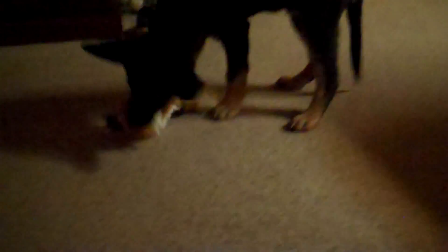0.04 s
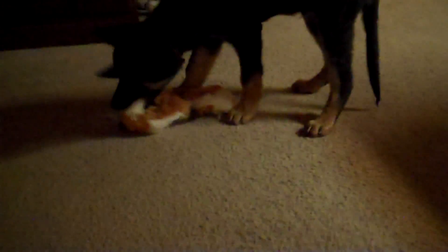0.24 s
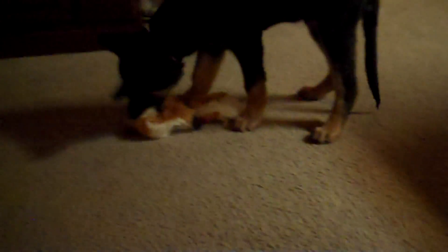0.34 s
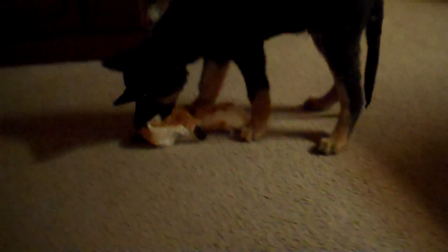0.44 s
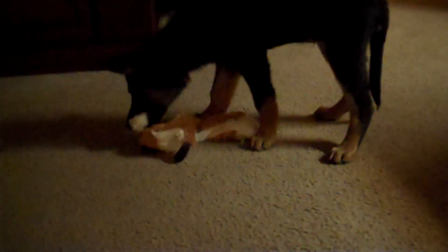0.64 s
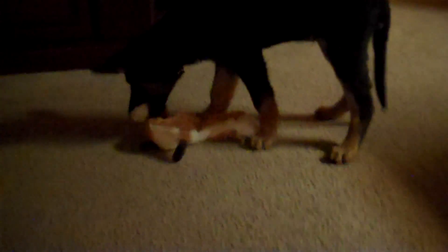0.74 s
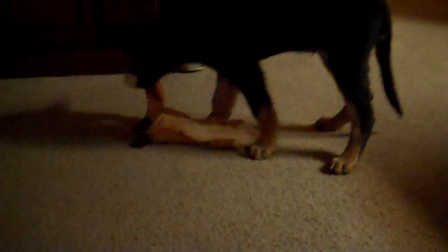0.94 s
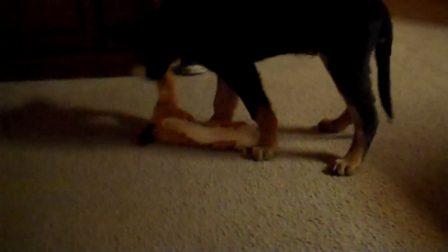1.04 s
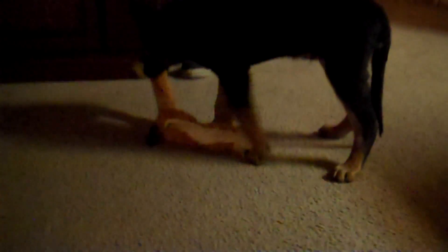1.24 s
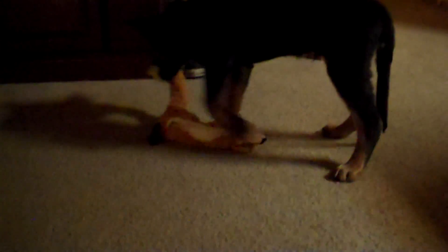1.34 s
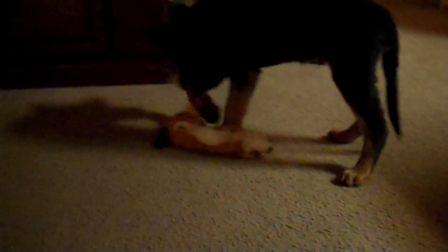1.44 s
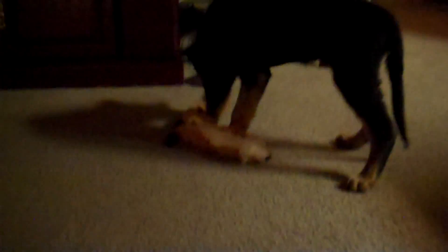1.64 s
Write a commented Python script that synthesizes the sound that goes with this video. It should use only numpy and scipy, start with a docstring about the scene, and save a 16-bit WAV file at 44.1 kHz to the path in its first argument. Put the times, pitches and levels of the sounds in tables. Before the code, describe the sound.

A squeaky toy gives four short, bright squeaks in an even rhythm as a dog chews it. Weak croaks, soft knocks, tooth ticks and plush rubbing fall between them, close to the microphone in a quiet carpeted room.

```python
"""A dog chews a plush squeaky toy on a carpet, close to a small camera, over a quiet room's low hum.
First air whistles into the bladder. From 0.2 s, four bites, 0.3 s apart, drive air through a plastic
reed that slaps shut about a thousand times a second. Between bites and into the last, weak flow makes
it croak, while jaws and paws knock, teeth tick and plush rubs. Soft knocks, a rub and a tick at 1.45 s
end the chewing. The room reverberates briefly after each sound."""
import sys
import numpy as np
from scipy import signal
from scipy.fft import rfft, irfft
from scipy.io import wavfile
from scipy.ndimage import uniform_filter1d

SR = 44100
rng = np.random.default_rng(int(sys.argv[2]) if len(sys.argv) > 2 else 0)


def generate_wav(signal):
    """Clip the signal to [-1, 1] and save it as 16-bit WAV at the path in sys.argv[1]."""
    frames = np.transpose(np.atleast_2d(signal))
    scaled = np.clip(frames, -1, 1) * 32767
    pcm = np.round(scaled).astype(np.int16)
    wavfile.write(sys.argv[1], SR, pcm)


N = 74970
HZ, TIME = np.fft.rfftfreq(N, 1 / SR), np.arange(N) / SR


def amp(db):
    """Amplitude ratio: tenfold for every 20 dB."""
    return 10 ** (np.asarray(db) / 20)

def unit(x):
    """Normalisation to rms 1."""
    return x / np.sqrt(np.mean(x ** 2) + 1e-20)

def read(points, hz):
    """Interpolation on a log-frequency axis."""
    f, value = np.transpose(points)
    return np.interp(np.log(hz + 1), np.log(f + 1), value)

def add(mix, start_s, sound):
    """Superposition of a delayed sound on the mix."""
    part = mix[max(round(start_s * SR), 0):][:len(sound)]
    part += sound[:len(part)]

def colour(x, gain_db):
    """Minimum-phase filter: the phase follows from the Hilbert transform of the log gain."""
    log_gain = np.log(amp(np.maximum(gain_db, -100)))
    mirrored = np.concatenate([log_gain, log_gain[-2:0:-1]])
    taps = np.fft.ifft(np.exp(np.conj(signal.hilbert(mirrored)))).real
    return signal.fftconvolve(x, taps[:2048])[:len(x)]

def noise(gain):
    """Spectral shaping of white noise, at rms 1."""
    return unit(irfft(rfft(rng.standard_normal(N)) * gain, N))

def resonances(modes):
    """Random excitation of damped modes: a narrow band of noise each."""
    return sum(amp(db) * noise(1 / (1 + 2 * ((HZ - hz) / width) ** 2)) for hz, width, db in modes)

def pair(a, b, correlation):
    """Partial coherence: two independent signals mix into left and right spectra."""
    shared = np.clip(read(correlation, HZ), -1, 1)
    return np.array([rfft(a), shared * rfft(a) + np.sqrt(1 - shared ** 2) * rfft(b)])

def wobble(length):
    """Random modulation: a moving average of noise over about one reed cycle."""
    return unit(uniform_filter1d(rng.standard_normal(length), 40))


# ambient noise spectrum: (frequency [Hz], relative density [dB])
AMBIENT = [(40, -32), (68, -2.5), (190, -5.5), (320, -1), (1030, -9), (2000, -13.5), (4400, -19),
           (6500, -15.5), (7700, -17), (9200, -25), (14000, -29)]
# its left-right coherence: (frequency [Hz], correlation [0-1])
AMBIENT_COHERENCE = [(290, 0.99), (640, 0.9), (1400, 0.63), (3000, .05)]
# its balance: (frequency [Hz], left minus right [dB])
AMBIENT_BALANCE = [(60, -6), (300, -1.5), (4400, -2.5), (6200, -6.5), (8000, 5.5), (14000, -3)]
# hum bands: (frequency [Hz], width [Hz], level [dB])
HUM = [(141, 22.4, -57.5), (288.8, 9.2, -61.5)]
def background():
    """Stationary noise: broadband rumble and hiss, with narrow bands that waver as a hum."""
    gain = amp(read(AMBIENT, HZ))
    air = amp(-49.5) * pair(noise(gain), noise(gain), AMBIENT_COHERENCE) + rfft(resonances(HUM))
    return irfft(air * amp(read(AMBIENT_BALANCE, HZ) * np.array([[.5], [-.5]])), N)


# reverberation time: (frequency [Hz], time to fall 60 dB [s])
ROOM_T60 = [(300, 0.27), (650, 0.37), (1200, 0.31), (7000, 0.23), (14000, 0.19)]
# spectrum of the tail: (frequency [Hz], gain [dB])
ROOM_COLOUR = [(200, 0.5), (1100, 6), (3500, -0.5), (6500, 2), (9000, -1), (14000, 8.5)]
# its left-right coherence: (frequency [Hz], correlation [0-1])
ROOM_COHERENCE = [(700, .92), (1400, 0.75), (3000, 0.078)]
def room(x, reflections_per_s=5000, delay_s=.0047, balance_db=-1.5):
    """Diffuse reverberation: random reflections decay exponentially, each band at its own rate."""
    taps = rng.standard_normal((2, N)) * (rng.random((2, N)) < reflections_per_s / SR)
    hz, t, bands = signal.stft(taps, SR, nperseg=256)
    decay = amp(-60 * t / read(ROOM_T60, hz)[:, None])
    tail = signal.istft(bands * decay, SR)[1][:, :N] * np.clip(TIME / delay_s - 1, 0, 1)
    spectra = pair(*tail / np.linalg.norm(tail[0]), ROOM_COHERENCE)
    tail = irfft(spectra * amp(read(ROOM_COLOUR, HZ)), N)
    return signal.fftconvolve(x[None], tail, axes=1)[:, :N] * amp(balance_db * np.array([[.5], [-.5]]))


# envelope of the inflow: (time [s], level [dB])
WHISTLE = [(.04, -58), (.085, -48), (.098, -61), (.115, -52), (.138, -54), (.165, -65)]
# its resonances: (frequency [Hz], width [Hz], relative level [dB])
WHISTLE_MODES = [(596, 45, -1), (964, 70, -2.5), (2260, 290, -1.5), (6400, 540, -5.5)]
def whistle():
    """Flow-excited resonance: air is drawn back into the bladder through the idle reed."""
    level_db = np.interp(TIME, *np.transpose(WHISTLE), left=-120, right=-120)
    return unit(resonances(WHISTLE_MODES)) * amp(level_db)


# strokes of the cloth: (time [s], duration [s], level [dB], tilt [dB/kHz])
RUBS = [(0.313, 0.063, -52, -1.5), (0.76, 0.032, -44.5, -0.5), (1.084, 0.045, -37.5, 0.5),
        (1.409, 0.036, -36, 1.5)]
# friction spectrum: (frequency [Hz], gain [dB])
PLUSH = [(150, -45), (500, 8), (2500, -11), (6000, -14.5), (14000, -15.5)]
def rubs(grain_db=3):
    """Friction noise: plush slides on teeth and carpet in short grainy swells."""
    out = np.zeros(N)
    for start, duration, db, tilt_db in RUBS:
        cloth = noise(amp(read(PLUSH, HZ) + tilt_db * HZ / 1000))
        swell = np.sin(np.pi * np.clip((TIME - start) / duration, 0, 1))
        out += amp(db) * unit(cloth * amp(grain_db * wobble(N))) * swell
    return out


# tooth contacts: (time [s], level before filtering [dB])
TICKS = [(.3414, -21.5), (.481, -34), (.660, -37), (0.9547, -23.5), (1.4505, -19)]
# their spectrum: (frequency [Hz], gain [dB])
TICK_COLOUR = [(1500, -17), (4000, -7), (7000, -3.5), (14000, 8)]
def ticks(decay_s=.0013):
    """Hard impact: teeth meet in a broadband impulse with a tiny scatter behind it."""
    out, t = np.zeros(N), np.arange(0, .01, 1 / SR)
    for start, db in TICKS:
        tail = .5 * rng.standard_normal(len(t)) * np.exp(-t / decay_s)
        add(out, start, amp(db) * (2 * (t == 0) + tail))
    return colour(out, read(TICK_COLOUR, HZ))


# padded impacts: (time [s], level before filtering [dB], frequency [Hz], decay time [s])
KNOCKS = [(.1742, -18.5, 1170, .0009), (.2130, -21.5, 750, .0013), (.4526, -27, 620, .0009),
          (.4531, -29, 1500, .0009), (.5308, -24, 700, .0012), (.7741, -22, 950, .0006),
          (.7878, -35, 800, .002), (1.0672, -22, 950, .0006), (1.0677, -25, 3300, .0004),
          (1.3608, -25.5, 1200, .0011), (1.3628, -27, 2750, .0006), (1.372, -33, 1250, .002)]
# their spectrum: (frequency [Hz], gain [dB])
KNOCK_COLOUR = [(60, -23.5), (400, 0.5), (14000, -8.5)]
def knocks(rise_s=.00005):
    """Damped oscillation: jaws and paws strike the toy, which snaps and rings for a cycle or two."""
    out, t = np.zeros(N), np.arange(0, .03, 1 / SR)
    for start, db, hz, decay_s in KNOCKS:
        snap = 2 * amp(-8.5) * uniform_filter1d(rng.standard_normal(len(t)), size=6)
        envelope = np.exp(-t / decay_s) * (1 - np.exp(-t / rise_s))
        add(out, start, amp(db) * (np.sin(2 * np.pi * hz * t) + snap) * envelope)
    return colour(out, read(KNOCK_COLOUR, HZ))


def scatter(x, level_db=-14, decay_s=.009):
    """Scattering: the dog's head and legs return short wavelengths as a spray of early reflections."""
    t = np.arange(0, .015, 1 / SR)
    taps = rng.standard_normal(len(t)) * np.exp(-t / decay_s)
    treble = signal.sosfilt(signal.butter(2, 3500, "high", fs=SR, output="sos"), x)
    return amp(level_db) * signal.fftconvolve(treble, taps / np.linalg.norm(taps))[:N]

def floor_bounce(x, reflection=.13, tilt_db_per_khz=-.31):
    """Absorption: the carpet reflects a weak copy with less treble."""
    return reflection * colour(x, tilt_db_per_khz * HZ / 1000)


# strong flow through the reed: (time [s], pitch [Hz], level [dB], roughness [0-1])
BITE_1 = [(.2148, 1075, -14, .06), (.217, 1086, -11, .06), (.2218, 1147, -12.5, .03),
          (.2285, 1075, -13.5, .03), (.234, 1102, -15.5, .05), (.239, 1130, -20, .08),
          (.245, 1115, -29, .15)]
BITE_2 = [(.5318, 965, -22, .15), (.5335, 1024, -14.5, .06), (.546, 1016, -17, .05), (.555, 1002, -18, .09),
          (.559, 972, -22, .16), (.564, 920, -25.5, .22), (.570, 870, -35, .25)]
BITE_3 = [(.8317, 997, -21, .06), (.8336, 1016, -15, .05), (.843, 1020, -18.5, .05), (.846, 1075, -14, .09),
          (.8495, 1110, -14.2, .1), (.856, 1029, -16.5, .13), (.862, 945, -23.5, .2), (.867, 880, -30, .25)]
BITE_4 = [(1.1215, 1070, -17.5, .05), (1.1235, 1092, -14, .06), (1.131, 1215, -12.5, .1),
          (1.135, 1070, -16, .3), (1.138, 985, -19.5, .45), (1.143, 930, -24.5, .55), (1.149, 880, -35, .6)]
# weak flow: (time [s], pitch [Hz], level [dB], roughness [0-1])
CROAK_1 = [(.346, 830, -42, .3), (.351, 680, -37, .3), (.359, 560, -46, .3)]
CROAK_2 = [(.9615, 784, -45.5, 0.11), (.967, 753, -27.5, 0.11), (.972, 710, -30, 0.13),
           (.976, 649, -36.5, 0.11), (.981, 612, -44, 0.21)]
CROAK_3 = [(1.087, 610, -45, .8), (1.096, 640, -36.5, .5), (1.104, 695, -36, .3), (1.119, 715, -35, .25),
           (1.145, 712, -41, .3)]
CROAK_4 = [(1.098, 565, -50, 0.33), (1.115, 600, -36, 0.32), (1.138, 593, -40, .25)]
# reed spectra when open, bitten hard, pinched and weakly blown: (frequency [Hz], gain [dB])
OPEN_REED = [(200, -22), (1100, -6), (2200, -2), (3300, -2.5), (4400, 1), (6500, 2), (9300, 3),
             (14000, -14)]
REED = [(150, -25), (450, -1), (700, 2.5), (1050, -6.5), (2100, -2.5), (3200, 0), (4400, 1.5), (6500, 1),
        (9000, -1), (11500, 0), (14000, -5.5)]
PINCHED_REED = [(300, -20), (1150, -12.5), (2200, -7), (3500, -1), (4700, 1.5), (6500, -2.5), (9000, -2),
                (14000, -15.5)]
SLACK_REED = [(150, -31.5), (600, 0), (2200, -2.5), (3700, -5.5), (4500, -11.5), (5500, 3), (6500, -15.5),
              (8700, -0.5), (14000, -17)]
# squeaks and croaks: (flow curve, reed spectrum, tilt [dB/kHz], bounce delay [s], room send [dB])
TOY_SOUNDS = [(BITE_1, OPEN_REED, 0, 0.00102, -15.5), (BITE_2, REED, 0, 0.001232, -15),
              (BITE_3, REED, -0.1, 0.00039, -13), (BITE_4, PINCHED_REED, 0, .00047, -12),
              (CROAK_1, SLACK_REED, -2.9, 0.0011, -15.5), (CROAK_2, SLACK_REED, 0, .00044, -12),
              (CROAK_3, SLACK_REED, -2.5, 0.0011, -13.5), (CROAK_4, SLACK_REED, -13.5, 0.00024, -8.5)]
def squeak(curve, reed, tilt_db, bounce_s, release_s=.0027, jitter=.18, shimmer=.35, hiss_db=-14):
    """Reed oscillation: periodic closure chops the flow into harmonics, duller as the flow weakens."""
    times, hz, db, rough = np.transpose(curve)
    t = np.arange(times[0] - .5 / hz[0], times[-1] + release_s, 1 / SR)
    hz, db, rough = (np.interp(t, times, v) for v in (hz, db, np.clip(rough, 0, 1)))
    cycles = np.cumsum(hz * (1 + jitter * rough * wobble(len(t)))) / SR - .5
    harmonic = np.arange(1, 25)[:, None]
    dulling_db_per_khz = .017 * (db - db.max())
    weights = amp(dulling_db_per_khz * harmonic * hz / 1000) * (harmonic * hz < SR / 2)
    slaps = unit((np.cos(2 * np.pi * harmonic * cycles) * weights).sum(0))
    puffs = unit(np.exp(-2 * (cycles % 1)) * rng.standard_normal(len(t)))  # one burst per cycle
    drive = slaps * (1 + shimmer * rough * wobble(len(t))) + amp(hiss_db) * np.sqrt(rough) * puffs
    voice = unit(colour(drive, read(reed, HZ) + tilt_db * HZ / 1000))
    voice *= amp(db) * np.clip((t[-1] - t) / release_s, 0, 1)
    out = np.zeros(N)
    add(out, t[0], voice)
    add(out, t[0] + bounce_s, floor_bounce(voice))
    return out + scatter(out)


# resonances of the two microphone ports: (frequency [Hz], gain [dB])
LEFT_PORT = [(1000, -0.5), (3000, 1), (4200, -4.5), (5200, -3), (6200, 2), (7300, 9), (8100, 6),
             (9100, -7.5), (10500, -11), (14000, -20)]
RIGHT_PORT = [(1000, 0.14), (3000, 1.5), (4200, -2.5), (5200, -0.5), (6200, 10.5), (7100, 4), (8100, -3.5),
              (9100, -13.5), (10500, -21), (14000, -32.5)]
def scene(handling_send_db=-11, tick_send_db=-17):
    """Superposition: direct and reverberant sound, coloured by the ports, adds to the background."""
    sources = [(squeak(*row), send_db) for *row, send_db in TOY_SOUNDS]
    sources += [(knocks() + rubs() + whistle(), handling_send_db), (ticks(), tick_send_db)]
    direct = sum(x for x, _ in sources)
    left, right = direct + room(sum(x * amp(send_db) for x, send_db in sources))
    ports = np.array([colour(left, read(LEFT_PORT, HZ)), colour(right, read(RIGHT_PORT, HZ))])
    return ports + background()

def record(dry, cutoff_hz=14450):
    """Band limiting: a linear-phase low-pass removes the highest treble."""
    lowpass = signal.firwin(255, cutoff_hz, window=("kaiser", 8), fs=SR)
    return signal.oaconvolve(dry, lowpass[None], "same")


dry = scene()
out = record(dry)
generate_wav(out)
```